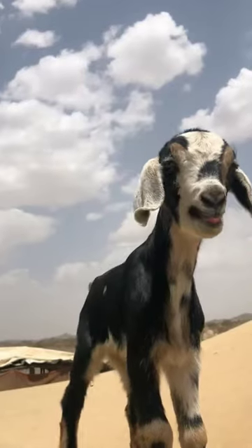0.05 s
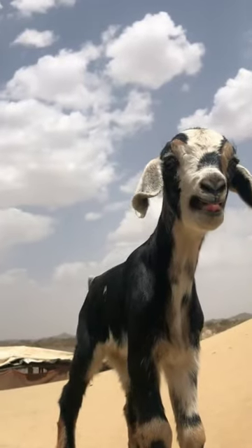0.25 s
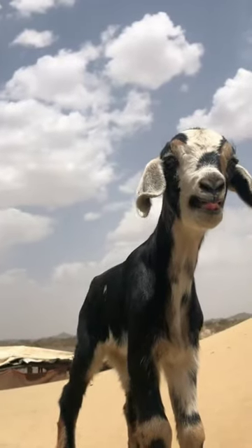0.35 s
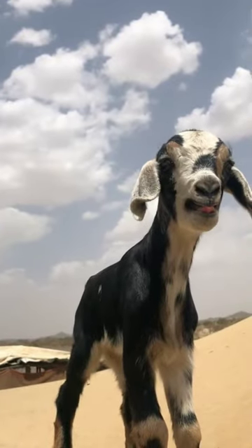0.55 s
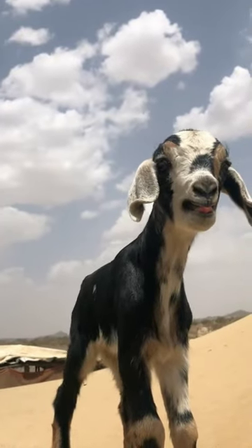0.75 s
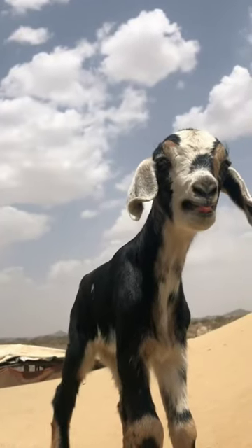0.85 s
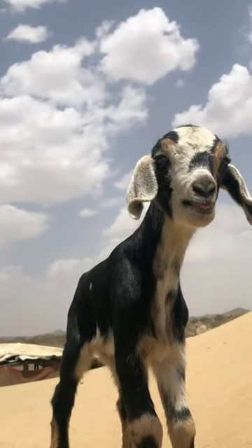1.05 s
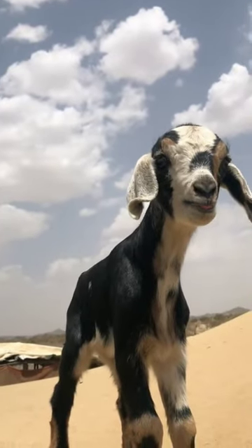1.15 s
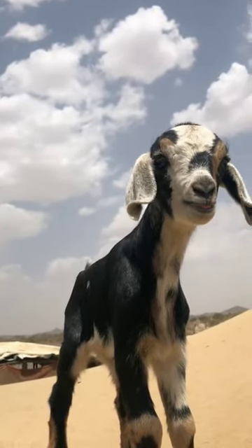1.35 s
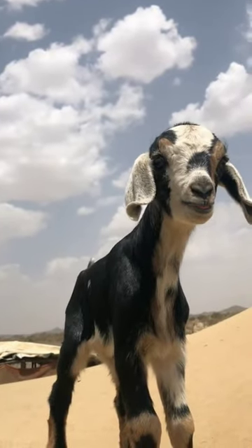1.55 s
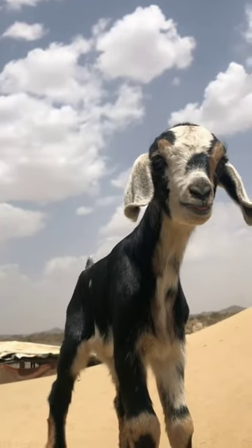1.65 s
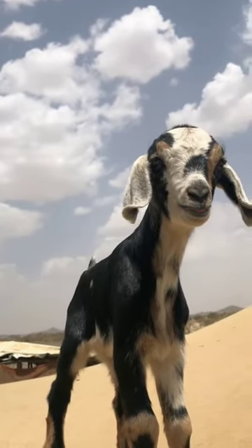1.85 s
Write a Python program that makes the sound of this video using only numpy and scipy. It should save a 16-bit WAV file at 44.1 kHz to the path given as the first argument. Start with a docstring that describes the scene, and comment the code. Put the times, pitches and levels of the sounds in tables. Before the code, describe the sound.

A young goat gives one loud, harsh, quavering bleat close by.

```python
"""Open sandy ground: a young goat gives one loud, harsh bleat close by.
Pulses from its vocal folds ring the throat and mouth while turbulent air rasps through them.
The voice quavers about ten times a second: each surge swells, overshoots in pitch and is pinched off;
the last one sinks into a croak. Faint wind rumble and hiss lie underneath, and one tick follows."""
import sys
import numpy as np
from scipy import signal
from scipy.fft import rfft, irfft, next_fast_len
from scipy.io import wavfile
from scipy.ndimage import uniform_filter1d, map_coordinates

SR = 44100
rng = np.random.default_rng(int(sys.argv[2]) if len(sys.argv) > 2 else 0)


def unload_audio(sound):
    """Save the sound as a 16-bit wav file, at the path given as the first command line argument."""
    columns = np.transpose(np.atleast_2d(sound))
    # keep every value between -1 and 1, then stretch to whole-number steps
    steps = np.round(np.clip(columns, -1, 1) * 32767)
    wavfile.write(sys.argv[1], SR, steps.astype(np.int16))


N = 83790
START_S, ATTACK_S, BRIGHTEN_S = .184, .022, .039  # the bleat's entry, fade-in and time to open up


def amp(db):
    """Decibels to gain."""
    return 10 ** (np.asarray(db) / 20)


def unit(x):
    """Scale to rms 1."""
    return x / np.sqrt(np.mean(x ** 2) + 1e-20)


def wobble(rate):
    """A smooth random curve, rate knots a second."""
    return map_coordinates(rng.standard_normal(int(N * rate / SR) + 4), [np.arange(N) * rate / SR])


def coloured(x, points):
    """x through a causal EQ drawn as (freq_hz, gain_db) points, scaled to rms 1."""
    m = 2 * next_fast_len(N)
    hz, db = np.transpose(points)
    shape = np.interp(np.log(np.fft.rfftfreq(m, 1 / SR) + 1), np.log(hz + 1), db)
    cepstrum = irfft(np.log(amp(shape)), m)
    cepstrum[1:m // 2] *= 2  # fold to minimum phase
    cepstrum[m // 2 + 1:] = 0
    return unit(irfft(rfft(x, m) * np.exp(rfft(cepstrum)), m)[:N])


# Fader moves of the air bed, before and after the call, ahead of the trims: time_s, rumble_db, hiss_db
AIR_FADERS = [
    [(0.0, -58, -59), (0.022, -65, -55), (0.034, -66.5, -58.5), (0.086, -65, -60), (0.152, -77, -61.5),
     (0.162, -84, -70), (0.17, -72, -61.5)],
    [(1.21, -68.5, -68), (1.41, -67, -71), (1.44, -61, -65), (1.464, -70, -69), (1.66, -74.5, -64),
     (1.748, -62, -59), (1.9, -78.5, -67.5)],
]
# EQ of the wind rumble, the hiss and its airy top: freq_hz, gain_db
RUMBLE_EQ = [(20, -19), (50, -4), (80, -4.5), (150, -11.5), (300, -29), (800, -73)]
HISS_EQ = [(59, -38), (100, -5), (315, -5.5), (518, -10.5), (574, -7.5), (1240, -17.5), (1500, -15),
           (1690, -20), (6000, -28.5), (7800, -58.5), (13200, -120)]
AIRY_TOP_EQ = [(1500, -20), (4500, -2), (9000, -1), (15500, -1)]

def outdoor_air(t):
    """Light wind rumbles on the microphone under a faint, drifting hiss."""
    time_s, rumble_db, hiss_db = np.vstack(AIR_FADERS).T
    top_db = -73 + .35 * (hiss_db - hiss_db.mean())  # loosely follows the hiss
    layers = [(rumble_db + 5, RUMBLE_EQ), (hiss_db + 3, HISS_EQ), (top_db, AIRY_TOP_EQ)]
    return sum(amp(np.interp(t, time_s, db)) * coloured(rng.standard_normal(N), eq) for db, eq in layers)


# EQ of the small, bright tick: freq_hz, gain_db
TICK_EQ = [(300, -21), (2500, -2), (5000, -1.5), (9000, -12), (15000, -15.5)]

def tick(t, start_s=1.773, level_db=-53, t60_s=.025):
    """One faint tick after the call: a fast-dying burst of noise."""
    envelope = (t > start_s) * amp(level_db - 60 * np.abs(t - start_s) / t60_s)
    return envelope * coloured(rng.standard_normal(N), TICK_EQ)


def sandy_ground(x, bounce_s=.0032, bounce_db=-24.5, scatter_db=-28, t60_s=.09):
    """The direct sound, one bounce off the sand and a little scatter."""
    t = np.arange(SR // 4) / SR
    tail = rng.standard_normal(len(t)) * amp(-60 * t / t60_s) * (t > bounce_s)
    scatter = signal.fftconvolve(x, tail / np.linalg.norm(tail))[:N]
    bounce = np.interp(np.arange(N) - bounce_s * SR, np.arange(N), x)
    return x + amp(bounce_db) * bounce + amp(scatter_db) * scatter


def fold_pulses(cycles, jitter_s):
    """One sharp pulse per closing of the vocal folds, scattered in time."""
    closings = np.interp(np.arange(1, int(cycles[-1])), cycles, np.arange(N))
    closings += jitter_s[closings.astype(int)] * SR * rng.standard_normal(len(closings))
    taps = closings.astype(int)[:, None] + np.arange(-7, 9)
    offset = taps - closings[:, None]
    windowed_sinc = np.sinc(offset) * np.cos(np.pi * offset / 16) ** 2
    return np.bincount(np.clip(taps, 0, N - 1).ravel(), windowed_sinc.ravel(), N)


# Envelope of the closing croak: time_s, level_db
CROAK_ENVELOPE = [(1.09, -51), (1.115, -42), (1.14, -36), (1.155, -37), (1.172, -51), (1.195, -66)]
# Its nasal EQ: freq_hz, gain_db
CROAK_EQ = [(120, -39), (280, -14), (420, -14), (620, -17.5), (880, -13), (1100, -15.5), (1380, 3),
            (1750, -11), (2200, -14), (2750, -10), (3300, -19), (4800, -12.5), (8000, -24.5), (15000, -33)]

def croak(t, cycles, grunt_s=1.153, grunt_hz=372.4, grunt_db=-49):
    """The folds go slack: irregular, breathy pulses and a low grunt end the call."""
    slack = unit(fold_pulses(cycles, jitter_s=np.full(N, 3e-5))) + amp(-9) * rng.standard_normal(N)
    level_db = np.interp(t, *np.transpose(CROAK_ENVELOPE), left=-120, right=-120)
    grunt_eq = [(grunt_hz * ratio, db) for ratio, db in [(.25, -30), (.53, -4), (1, 0), (2, -22), (10, -60)]]
    grunt = coloured(rng.standard_normal(N), grunt_eq)
    swell = np.exp(-((t - grunt_s) / .007) ** 2 / 2)
    return amp(level_db) * coloured(slack, CROAK_EQ) + amp(grunt_db) * swell * grunt


# EQ of the turbulence in the throat: freq_hz, gain_db
RASP_EQ = [(300, -55.5), (850, -47), (1120, -25), (1400, -34), (1660, -1.5), (2000, -29), (2280, -8),
           (2600, -17.5), (2850, -8.5), (3500, -4), (4200, -5), (5200, -2.5), (7200, -3), (9800, -4),
           (11700, -14), (12400, -16.5), (13800, -16.5), (15500, -18.5)]

def rasp(cycles, pitch_hz):
    """Turbulent air, gated by the folds; it half repeats each cycle, so it clings to the harmonics."""
    air = rng.standard_normal(N)
    echo = map_coordinates(air, [np.arange(N) - SR / pitch_hz])
    gate = 1 + .8 * np.cos(2 * np.pi * cycles - .9)
    return coloured((air + .9 * echo) * gate, RASP_EQ)


# Resonances of the throat and mouth: centre_hz, width_hz, gain_db
FORMANTS = [(1140, 416, -3), (1647, 259, 0), (2333, 280, -8.5), (2870, 420, -11), (3564, 273, -1),
            (3924, 810, -6), (5080, 417, 2), (5785, 556, -2), (6150, 260, -1.5), (7170, 220, -11.5),
            (7840, 240, -10.5), (8530, 87, -10.5), (9200, 480, -14.5), (11190, 1700, -19.5),
            (14500, 5000, -28.5)]

def throat(x, flutter_db=1.7):
    """x rings every resonance, in alternating polarity; their strengths flutter."""
    m = next_fast_len(N + SR // 4)
    f, spectrum, out = np.fft.rfftfreq(m, 1 / SR), rfft(x, m), 0
    for k, (hz, width, db) in enumerate(FORMANTS):
        ring = irfft(spectrum * 1j * f * width / (hz * hz - f * f + 1j * f * width), m)[:N]
        out = out + (-1) ** k * amp(db + flutter_db * wobble(110)) * ring
    return out


def register(t, sound, low_hz=1380, lead_db=9.5, lead_s=.057, dulling_db_per_s=3):
    """The two lowest harmonics lead at the start and crack in the first troughs; the top slowly dulls."""
    low = signal.sosfiltfilt(signal.butter(8, low_hz, fs=SR, output="sos"), sound)
    lead = amp(lead_db * np.clip(1 - (t - START_S - ATTACK_S) / lead_s, 0, 1))
    dips = sum(np.exp(-((t - crack_s) / .006) ** 2) for crack_s in (.266, .354, .430))
    cracks = np.clip(1 - .8 * dips, 0, 1)
    body = signal.sosfiltfilt(signal.butter(4, 1.5 * low_hz, fs=SR, output="sos"), sound)
    top = (sound - body) * amp(-dulling_db_per_s * (t - .65))  # the mouth slowly closes
    brighten = np.clip((t - START_S) / BRIGHTEN_S, 0, 1)
    return low * lead * cracks + (body - low + top) * brighten


def steady(x, window_s=.008):
    """Even out the loudness, so that flutter changes only the colour."""
    size = int(window_s * SR)
    power = np.abs(uniform_filter1d(uniform_filter1d(x ** 2, size), size))
    return x / np.sqrt(power + 1e-9)


# Targets for each surge and the trough after it:
# crest_s, pitch_hz, overshoot_hz, crest_db, trough_db, trough_roughness (0-1)
SURGE_TARGETS = [(0.231, 545.7, 6.6, -19, -23.5, 0), (0.318, 571.2, 15.9, -11, -16.5, 0),
                 (.398, 583, 28.5, -12.5, -17.5, 0), (0.483, 574.2, 28, -12, -19.5, 0.3),
                 (0.577, 565.4, 32.4, -11.5, -28.5, 0.64), (.682, 551, 22, -11, -26.5, 0.6),
                 (0.771, 567, 40, -11.5, -23.5, 0.5), (0.873, 564, 32.6, -12, -28, 0.59),
                 (0.982, 538.9, 20, -11, -31.5, 0.25), (1.081, 529, 17.7, -12.5, -38.5, 0.48)]
# One quaver, crest to crest: cycle_share, pinch (0-1), ripple (share of the pitch)
QUAVER_SHAPE = [(0, 0.13, 0), (.09, 0.08, -0.0093), (0.178, 0.5, -0.037), (.34, 0.94, -.018),
                (.43, .9, -.016), (.57, 0.63, .016), (.76, 0.17, -.016), (.88, 0.08, -.006),
                (0.999, 0.11, 0)]

def quaver(t, cycle_s=.105, sink_s=1.105, sink_hz_per_s=1900, fade_s=1.127, fade_db_per_s=601.5):
    """Pitch, level, pinch and roughness of the voice, surge after surge, until it sinks and fades."""
    crest_s, held_hz, overshoot_hz, crest_db, trough_db, trough_rough = np.transpose(SURGE_TARGETS)
    marks_s = np.r_[crest_s[0] - cycle_s, crest_s, crest_s[-1] + cycle_s]
    held_t = np.minimum(t, sink_s + .012)  # the quaver stops as the voice sinks
    phase = np.interp(held_t, marks_s, np.arange(len(marks_s))) % 1
    share, pinch, ripple = np.transpose(QUAVER_SHAPE)
    pinch, ripple = (uniform_filter1d(np.interp(phase, share, c), size=220) for c in (pinch, ripple))
    pinch = np.clip(pinch, 0, 1) * (t > crest_s[0] - .03)
    strain = np.exp(-((t - crest_s[:, None]) / .009) ** 2)  # the voice strains at each crest
    pitch_hz = np.interp(t, crest_s - cycle_s / 3, held_hz) * (1 + ripple) + overshoot_hz @ strain
    pitch_hz *= 1 - .049 * np.clip(1 - (t - START_S) / BRIGHTEN_S, 0, 1)  # starts a little flat
    pitch_hz -= sink_hz_per_s * np.clip(t - sink_s, 0, .08)
    trough_s = crest_s + cycle_s / 3
    level_db = (1 - pinch) * np.interp(t, crest_s, crest_db) + pinch * np.interp(t, trough_s, trough_db)
    level_db -= fade_db_per_s * np.maximum(t - fade_s, 0)
    roughness = pinch * np.interp(t, trough_s, trough_rough) + .22 * strain[1:].sum(0)
    return pitch_hz, level_db, pinch, roughness


# EQ of the voice, full in a surge and thin in a trough: freq_hz, gain_db
OPEN_EQ = [(200, -23.5), (560, -3), (1100, -2.5), (3000, -0.5), (6000, 1), (11500, -1.5), (12400, -5.5),
           (14000, -0.5)]
PINCHED_EQ = [(200, -36.5), (560, -9), (1130, -15.5), (1600, -4), (2300, -5.5), (3400, 2.5), (5200, 3),
              (8000, 5.5), (11500, -3.5), (12400, -7.5), (14000, -5)]

def bleat(t):
    """Fold pulses ring the open or pinched throat; air rasps through once a cycle."""
    pitch_hz, level_db, pinch, roughness = quaver(t)
    waver = .003 * (1 + 2 * roughness) * wobble(170)
    cycles = np.cumsum(pitch_hz * (1 + waver)) / SR
    pulses = fold_pulses(cycles, jitter_s=1.8e-6 * (1 + 10 * roughness))
    shimmer = amp(.5 * wobble(110))
    ring = throat(pulses * shimmer)
    voice = (1 - pinch) * steady(coloured(ring, OPEN_EQ)) + pinch * steady(coloured(ring, PINCHED_EQ))
    rasp_db = np.interp(t, [START_S, .55], [-20.5, -15.5]) + 17 * roughness  # coarsens as it goes on
    sound = voice * (1 - .5 * roughness) + rasp(cycles, pitch_hz) * amp(rasp_db)
    attack = np.clip((t - START_S) / ATTACK_S, 0, 1) ** 2
    return amp(level_db) * attack * register(t, sound) + croak(t, cycles)


def scene():
    """The goat on open ground over the air bed, in mono."""
    t = np.arange(N) / SR
    return (sandy_ground(bleat(t)) + outdoor_air(t) + tick(t))[None]


def record(dry, top_hz=15580):
    """A brick-wall high cut on the whole mix."""
    m = next_fast_len(N + SR // 2)
    return irfft(rfft(dry, m) * (np.fft.rfftfreq(m, 1 / SR) < top_hz), m)[:, :N]


dry = scene()
out = record(dry)
unload_audio(out)
```